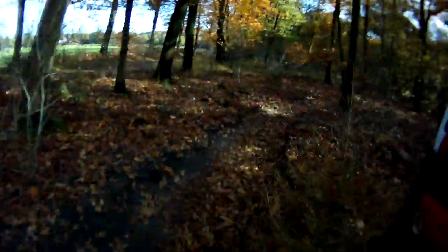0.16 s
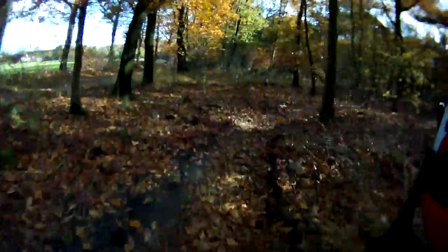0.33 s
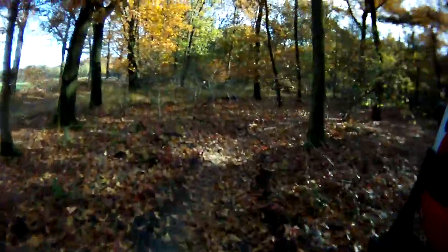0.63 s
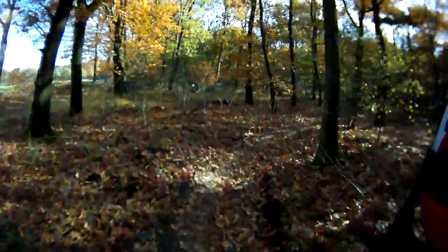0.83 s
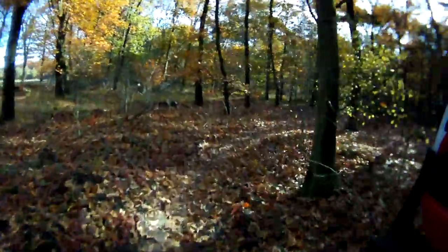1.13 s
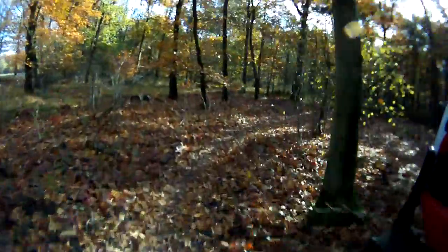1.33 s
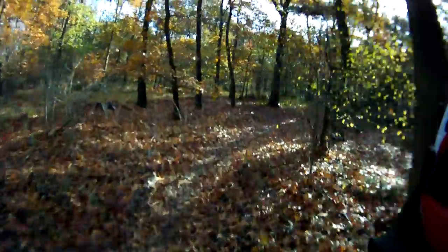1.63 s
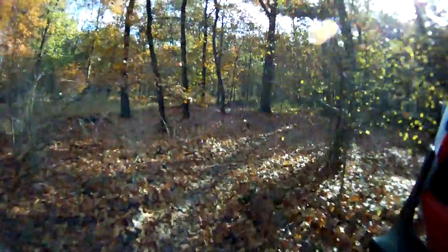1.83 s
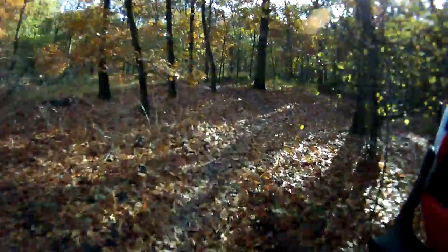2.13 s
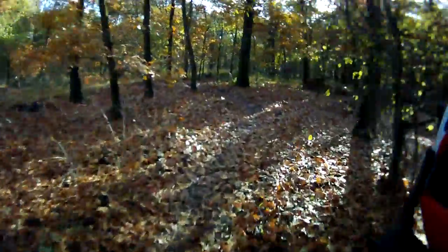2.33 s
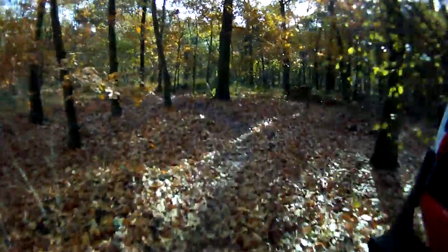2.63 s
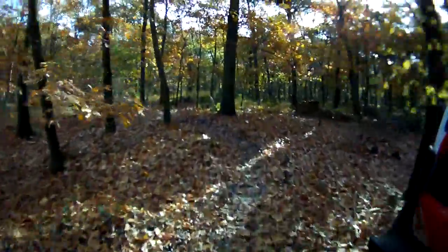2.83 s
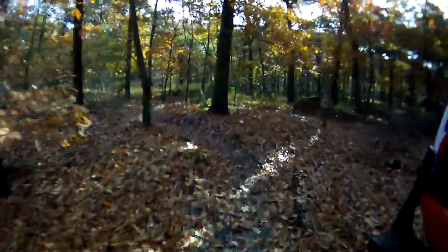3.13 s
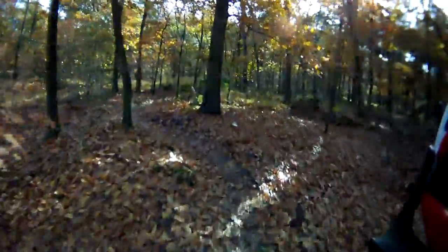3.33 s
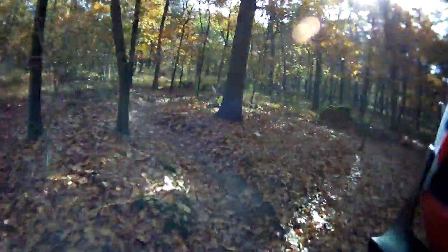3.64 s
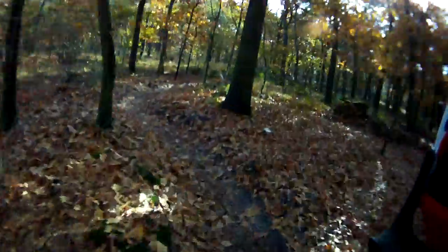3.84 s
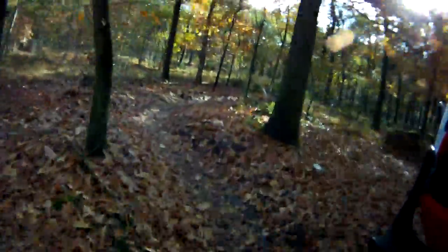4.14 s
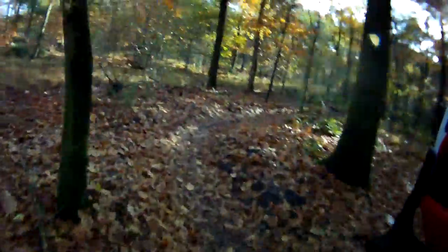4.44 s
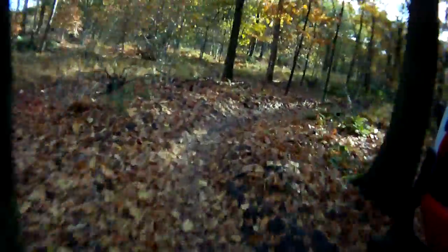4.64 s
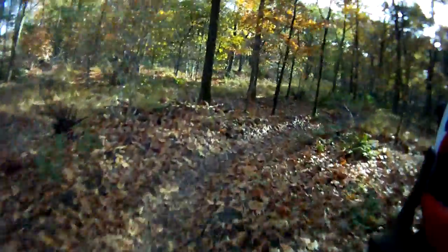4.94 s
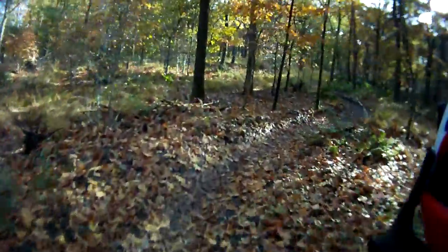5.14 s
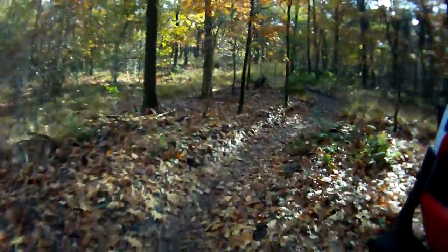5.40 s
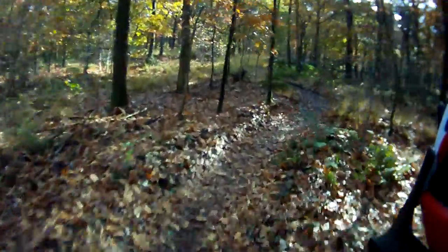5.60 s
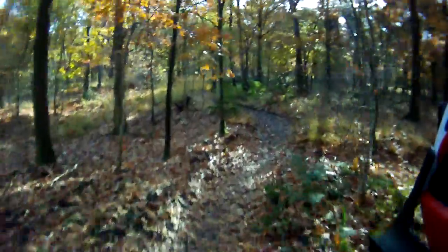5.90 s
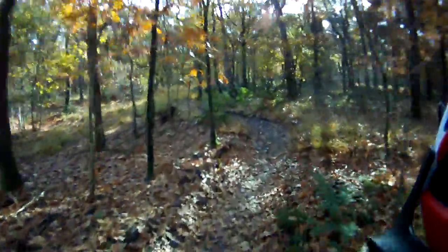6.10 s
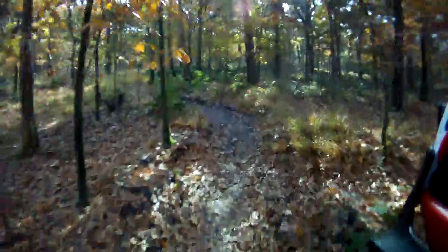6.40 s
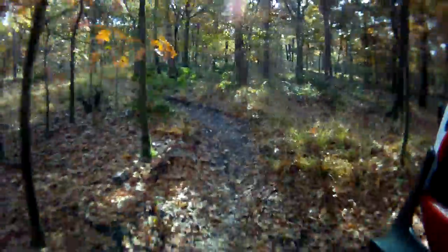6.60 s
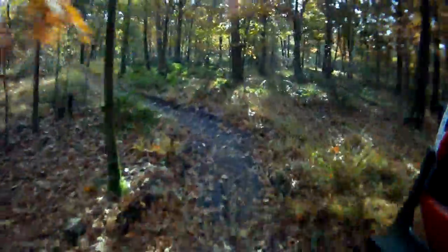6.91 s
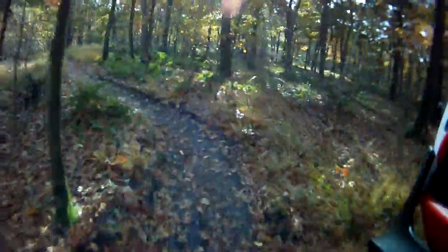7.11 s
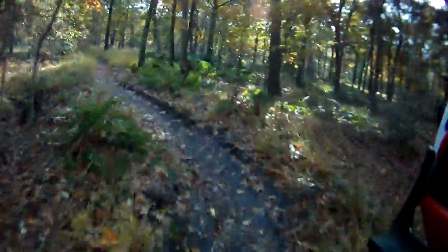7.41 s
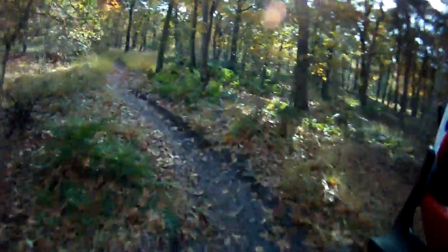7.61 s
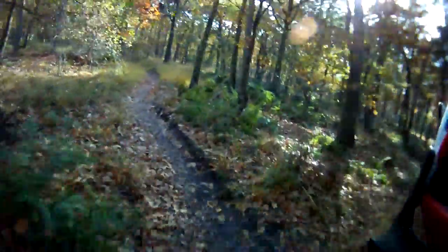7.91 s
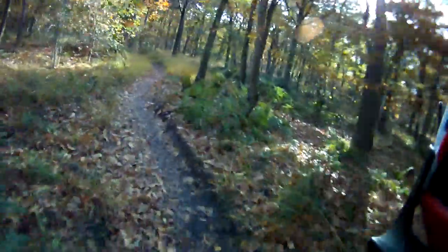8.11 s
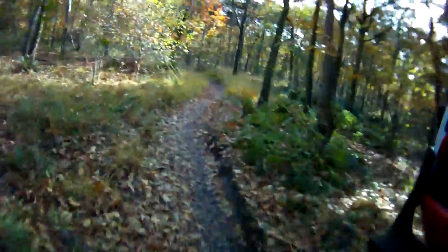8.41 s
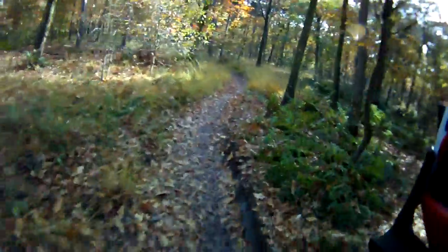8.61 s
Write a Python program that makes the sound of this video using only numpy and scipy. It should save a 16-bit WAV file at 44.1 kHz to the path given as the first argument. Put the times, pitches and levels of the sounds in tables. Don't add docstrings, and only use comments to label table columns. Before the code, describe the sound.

A boxed-in camera microphone rides with a bicycle over a leaf-covered trail. Wind and tyres make a constant, muffled, fluctuating rumble; leaves rustle and crackle with a hollow plastic colour. Small taps, pings and soft jolts come irregularly. The ride swells near three and again before seven seconds, with a hard crack just after four and another close to the end.

```python
import sys
import numpy as np
from scipy import signal
from scipy.fft import rfft, irfft, next_fast_len
from scipy.io import wavfile
from scipy.ndimage import uniform_filter1d, map_coordinates

SR = 44100
rng = np.random.default_rng(int(sys.argv[2]) if len(sys.argv) > 2 else 0)


def elevation(decibels):
    levels = np.asarray(decibels, float)
    return 10 ** (levels / 20)


def wav_out(sig):
    wavfile.write(sys.argv[1], SR, np.round(np.clip(np.atleast_2d(sig).T, -1, 1) * 32767).astype(np.int16))


N = 385875
TAIL = 1500


def unit(x):
    return x / np.sqrt(np.mean(x ** 2) + 1e-20)


def curves(rows):
    s, *cols = np.transpose(rows)
    return [np.interp(np.arange(N) / SR, s, c) for c in cols]


def swells(rows):
    t = np.arange(0, N / SR, .002)
    total_db = sum(db * np.exp(-((t - s) / half) ** 2) for s, db, half in rows)
    return np.interp(np.arange(N) / SR, t, total_db)


def wobble(rate):
    knots = rng.standard_normal(int(N * rate / SR) + 4)
    return map_coordinates(knots, [np.arange(N) * rate / SR])


def filtered(x, response):
    m = next_fast_len(len(x) + 8192)
    return irfft(rfft(x, m) * response(np.fft.rfftfreq(m, 1 / SR)), m)[:len(x)]


def resonance(mode):
    centre, width, db = mode
    return lambda f: elevation(db) * 1j * f * width / (centre * centre - f * f + 1j * f * width)


def ringing(modes, x):
    return sum((-1) ** k * filtered(x, resonance(mode)) for k, mode in enumerate(modes))


def rush(spectrum, patchy_db):
    z = signal.stft(rng.standard_normal(N), nperseg=512)[2]
    field = uniform_filter1d(rng.standard_normal(z.shape), size=4, axis=0)
    field = uniform_filter1d(field, size=8, axis=1)
    noise = signal.istft(z * elevation(patchy_db * unit(field)), nperseg=512)[1][:N]
    hz, db = np.transpose(spectrum)
    return unit(filtered(noise, lambda f: elevation(np.interp(np.log(f + 1), np.log(hz), db))))


def add(out, s, db, hz, t60, rise):
    t = np.arange(TAIL)[:, None] / SR
    ring = np.sin(2 * np.pi * (np.atleast_1d(hz) * t + .2 * rng.random(np.size(hz))))
    envelope = elevation(db - 60 * t / t60) * (1 - np.exp(-(t / rise) ** 2))
    out[round(s * SR):][:len(t)] += np.sum(envelope * ring, axis=1)


def single_tones(rows, louder_db, t60, rise):
    out = np.zeros(N + TAIL)
    for s, db, hz in rows:
        add(out, s, db + louder_db, hz, t60, rise)
    return out[:N]


# (f/Hz, level/dB per Hz)
BUFFET = [(10, -43), (25, -8.5), (60, -1.5), (100, 0.5), (160, 2), (250, -1), (400, -8), (800, -60),
          (1600, -100)]
# (t/s, level/dB)
WIND = [(0, -47.5), (.6, -47), (1.2, -45.5), (1.75, -46), (2.35, -44), (2.55, -43), (2.85, -41.5),
        (3.2, -44), (3.9, -45.5), (4.5, -49), (5.2, -46.5), (5.65, -47), (6.2, -44.5), (6.7, -43.5),
        (7.3, -43.5), (7.6, -47.5), (7.95, -46), (8.75, -46.5)]
# (t/s, level change/dB)
EDDIES = [(0, 0), (.9, -3), (1.5, -2.5), (2.1, 1), (2.6, -2), (3.1, 2), (3.7, -1), (4.9, 3), (5.9, -2),
          (6.9, 1), (7.5, 1), (8.75, 1.5)]
# (t/s, level change/dB, half length/s)
SHELTER = [(.12, -6, 0.032), (.69, 4.5, .03), (.96, 3.5, 0.027), (.61, -3, 0.028), (1.3, -4, .09),
           (2.44, -3, .03), (5.33, -4, .04), (6.24, -3, .03), (7.07, 3, 0.027), (7.41, -3, .02),
           (7.72, -3, .025), (7.92, 3.5, .03), (8.48, -3, .02), (1.8, 4, 0.035), (1.89, -7, 0.04),
           (4.68, 2.5, 0.036), (5.13, -5, 0.046), (5.88, 4.5, 0.034), (6.0, -3, 0.033), (6.94, -10, .02),
           (7.15, -3.5, 0.044), (8.02, -5, 0.017), (8.55, -5, 0.07)]


def wind():
    eddy_hz = 115
    shelter_db = swells(SHELTER)
    buffet = rush(BUFFET, patchy_db=-0.8)
    throb = filtered(buffet, lambda f: 1 / (1 + (f / eddy_hz) ** 6))
    buffet = buffet + (elevation(curves(EDDIES)[0] - .5 * shelter_db) - 1) * throb
    return elevation(curves(WIND)[0] + shelter_db) * buffet


def unloading():
    t = np.arange(N) / SR
    dip = np.zeros(N)
    for s, *_ in list(JOLTS) + list(STONES):
        near = slice(max(round((s - .04) * SR), 0), round(s * SR))
        dip[near] -= 8 * np.exp((t[near] - s) / 0.0062)
    return uniform_filter1d(dip, size=40)


# (f/Hz, level/dB per Hz)
RUMBLE = [(80, -56), (160, -26), (280, -3.5), (420, 0), (540, 0), (700, -6.5), (900, -15.5), (1200, -29),
          (2500, -71)]
# (f/Hz, level/dB per Hz)
SCRUB = [(500, -69), (900, 0.5), (1150, 1), (1550, 1), (2000, -4), (3000, -7), (6000, -31)]
# (t/s, level/dB)
LOAD = [(0, -48), (.4, -47.5), (1.2, -46.5), (1.7, -46.5), (2.4, -45), (2.75, -43.5), (3.1, -46),
        (3.8, -44.5), (4.1, -47.5), (5, -46.5), (5.15, -48.5), (5.6, -47), (5.9, -44.5), (6.6, -42),
        (7.1, -43.5), (7.6, -48.5), (8.1, -46.5), (8.75, -47)]
# (t/s, level change/dB, half length/s)
HUMPS = [(.12, -3, .02), (.9, -3, 0.06), (1.13, 3.5, .02), (1.17, -2, .015), (2.62, 2.5, .03),
         (3.27, -2, .05), (6.33, 2, 0.028), (6.49, -2, 0.023), (6.55, 3.5, 0.021), (6.61, -2.5, 0.018),
         (6.74, 2.5, .03), (6.83, -2, .04), (7.65, -1, .03), (7.8, 2, .04), (1.25, -2.5, 0.078),
         (1.83, 4.5, .02), (1.89, -2.5, 0.056), (2.04, 2, .02), (3.07, 3.5, .04), (3.42, 1.5, 0.04),
         (3.57, -3.5, 0.074), (4.1, -2.5, .04), (4.31, 4, 0.056), (4.52, 3, 0.048), (4.68, -2, 0.033),
         (4.75, 3, 0.038), (5.3, 2, 0.083), (5.63, -3.5, 0.091), (6.02, -3.5, 0.036), (6.21, -3, 0.047),
         (7.87, -2.5, 0.011), (7.92, 3.5, .03), (8.02, -2.5, .02), (8.1, 2.5, 0.026), (8.15, -3.5, 0.029),
         (8.26, 2, 0.039)]


def tyres():
    rumble_db = curves(LOAD)[0] + swells(HUMPS)
    usual_db = rumble_db.mean()
    scrub_db = usual_db - 18.5 + 0.92 * (rumble_db - usual_db)
    scrub_db = scrub_db + 0.1 * swells(HEAPS) + 0.52 * wobble(15)
    bumps = wobble(60)
    rumble = unit(elevation(1.0 * bumps) * rush(RUMBLE, patchy_db=0.5))
    scrub = unit(elevation(0.7 * bumps + 1.7 * wobble(150)) * rush(SCRUB, patchy_db=-0.8))
    return elevation(rumble_db + unloading()) * rumble + elevation(scrub_db) * scrub


def crackles(per_second, size_db, clump_db, count):
    density = per_second * elevation(clump_db * wobble(14))
    draw = rng.random((count, 3))
    arrival = np.cumsum(-np.log(1 - draw[:, 0]))
    at = np.searchsorted(np.cumsum(density) / SR, arrival)
    size = elevation(-size_db * np.log(1 - .998 * draw[:, 1])) * np.sign(draw[:, 2] - .5)
    return np.bincount(at[at < N], size[at < N], N)


def crush():
    snapping = unit(crackles(1500, size_db=3.5, clump_db=1.26, count=30000))
    return snapping + 0.5 * rng.standard_normal(N)


# (f/Hz, width/Hz, level/dB)
CASE = [(1550, 400, -2), (2450, 280, 3), (2980, 310, 4.5), (3904, 670, 6), (4880, 670, 2), (5760, 260, -8),
        (6700, 560, -7.5), (9000, 2200, -14), (12160, 430, -22)]
# (t/s, level/dB)
DEPTH = [(0.0, -65), (0.36, -64), (0.78, -68), (1.61, -64.5), (1.88, -62.5), (2.24, -64.5), (2.7, -59),
         (2.9, -67), (3.34, -61), (3.51, -65.5), (4.97, -62.5), (5.07, -63), (5.78, -67.5), (6.21, -62.5),
         (7.14, -65), (7.63, -69.5), (8.09, -68.5), (8.75, -70.5)]
# (t/s, level change/dB, half length/s)
HEAPS = [(.06, 8, 0.024), (.16, -4, .02), (.21, 2.5, .03), (.54, 3, .015), (.88, 2, .015), (3.95, 3, .06),
         (4.53, 2, .03), (5.3, 1, 0.073), (3.16, -3, .045), (3.29, 2, .05), (3.55, -4, .04),
         (.34, 5.5, .02), (.5, 2, 0.03), (.66, 8.5, 0.0093), (1.0, 3, .02), (1.1, 2, .03), (1.33, 2, .04),
         (1.62, 2, 0.025), (2.27, 4, .03), (2.5, 3.5, 0.04), (2.86, 5.5, 0.047), (3.7, 3, .03),
         (3.87, -7, 0.015), (4.12, -2, 0.013), (4.2, 4.5, 0.075), (4.41, 2.5, 0.017), (4.6, 5, 0.021),
         (5.04, 3.5, 0.072), (5.55, 3, 0.073), (4.28, 6, .008), (4.89, 3, .02), (6.14, 4.5, 0.036),
         (6.23, 4, .025), (6.5, 2.5, .03), (6.44, 4.5, 0.024), (6.96, 2.5, .03), (7.1, 8, .02),
         (8.125, 6, 0.018), (1.27, -2.5, .03), (8.71, 9, 0.033)]


def leaves():
    crunch_db = curves(DEPTH)[0] + swells(HEAPS)
    bright_db = -8.5 - 0.2 * (crunch_db - crunch_db.mean()) + 0.7 * wobble(12)
    flutter_db = 1.5 * wobble(50)
    shared = crush()
    body = np.zeros(N)
    for k, mode in enumerate(CASE[1:5]):
        body += (-1) ** k * filtered(shared + 1.17 * crush(), resonance(mode))
    body = filtered(unit(body), lambda f: 1 / np.sqrt(1 + (f / 5250) ** 16))
    edge = unit(ringing(CASE[5:], shared + 2.1 * crush()))
    return elevation(crunch_db + flutter_db - 1.15) * (body + elevation(bright_db - 0.5) * edge)


WRITES = [1, 3, 4, 6, 8, 9, 11, 14, 17, 18, 21, 24, 26, 28, 29, 32, 33, 34, 36, 39, 44, 45, 47, 49, 50, 51,
          53, 54, 56, 58, 62, 64, 66, 68, 70, 72, 74, 77, 78, 80, 82, 83, 85]


def writing():
    first_s, slot_s, half_s = .028, 1 / 9.99, .011
    return swells([(first_s + slot * slot_s, 1, half_s) for slot in WRITES])


# (f/Hz, level/dB per Hz)
HISS = [(1000, 3.5), (3000, -3.5), (6000, -0.5), (8000, -4.5), (10500, -3), (12000, -2.5), (12800, -3),
        (13400, 3), (14900, 0.5), (15400, -60)]
# (f/Hz, level/dB per Hz)
FIZZ = [(10000, -40), (10800, -6), (11500, 0), (12300, -1), (13000, -8), (14500, -8), (15400, -40)]
# (f/Hz, rms level/dB)
WHINE = [(5545, -90), (11090, -97)]


def electronics():
    t = np.arange(N) / SR
    whine = np.zeros(N)
    for hz, db in WHINE:
        whine += np.sqrt(2) * elevation(db) * np.sin(2 * np.pi * hz * t + 0.77 * wobble(30))
    hiss = elevation(-68.0) * rush(HISS, patchy_db=1.4)
    fizz = elevation(-74) * writing() * rush(FIZZ, patchy_db=1.5)
    return hiss + fizz + whine


# (t/s, peak level/dB, f/Hz)
PINGS = [(0.025, -49, 6450), (4.1704, -49, 6290), (4.2268, -46, 5900), (4.3021, -44, 6460),
         (4.6783, -55, 6780), (4.7435, -44, 5750), (4.988, -40, 6490), (6.0636, -47, 5740),
         (6.3465, -52, 6340), (6.733, -41.5, 5950), (7.414, -50, 6450), (7.7248, -44, 6300),
         (8.0222, -48, 6430), (8.3175, -48, 6380), (8.7225, -30.5, 6500)]


def pings():
    return single_tones(PINGS, louder_db=1.5, t60=0.0065, rise=0.00051)


# (f/Hz, level/dB, t60/s)
STRUCK = [(1590, -3, 0.016), (2780, 5.5, 0.016), (3100, 7, 0.013), (3700, 1.5, 0.01), (4100, 1.5, 0.013),
          (5030, 2, 0.023), (5950, -7, 0.0075), (6370, 3, 0.0092)]
# (t/s, peak level/dB, centre f/Hz)
TWIGS = [(0.0253, -52, 2780), (0.0648, -52, 3030), (0.9827, -49, 2980), (1.1263, -54, 2790),
         (1.1817, -55, 2710), (1.7325, -49, 3240), (2.2323, -48, 3280), (2.2583, -49, 3040),
         (2.4613, -55, 3000), (2.6125, -48, 3090), (2.8345, -50, 3230), (3.1622, -54, 3000),
         (3.2799, -44, 3200), (3.7389, -49, 2840), (3.8167, -54, 3080), (4.144, -49, 2800),
         (4.2192, -43, 2850), (5.3887, -51, 3010), (5.872, -52, 2900), (6.0711, -51, 3120),
         (6.8932, -49, 2970), (6.9531, -51, 3010), (7.2878, -53, 3170), (7.2993, -53, 3110),
         (7.309, -50, 2950)]
# (t/s, peak level/dB, centre f/Hz)
GRIT = [(0.3394, -51, 4050), (0.6614, -46, 3830), (0.9832, -44, 3980), (1.1812, -47, 3700),
        (2.638, -45, 4650), (2.6928, -45, 4040), (2.7242, -46, 4030), (2.7506, -45, 4300),
        (2.8574, -43, 3950), (4.1285, -51, 3850), (4.5406, -53, 4060), (4.6783, -55, 3700),
        (4.9357, -44, 3870), (4.9801, -47, 3880), (5.03, -44.5, 4180), (5.461, -49, 3910),
        (6.0636, -51, 3950), (7.0609, -48, 3850), (7.0913, -50, 3840), (7.423, -49, 3700),
        (7.4839, -50, 3800), (7.9458, -49, 4000), (8.4103, -46, 3980)]
# (t/s, peak level/dB, centre f/Hz)
MORE_TICKS = [(0.1795, -52, 3750), (2.1051, -51, 3570), (2.2827, -49, 5030), (2.5494, -49, 3940),
              (4.038, -46, 3910), (4.3056, -49, 4690), (4.3994, -49, 4510), (7.2394, -54, 3820),
              (7.2594, -51, 4120), (7.3876, -53, 3950), (7.5094, -54, 4920), (7.87, -49, 3670),
              (7.8844, -48, 3920), (7.9244, -54, 4080), (7.9678, -52, 5180)]


def ticks():
    out = np.zeros(N + TAIL)
    tick_db, own_db, fall_db_per_octave = -7.5, 3, 14
    hz, mode_db, t60 = np.transpose(STRUCK)
    for s, db, centre_hz in list(TWIGS) + list(GRIT) + list(MORE_TICKS):
        own_t60 = 0.013 * np.exp(-0.02 * (db + 47))
        add(out, s, db + tick_db + own_db, centre_hz, own_t60, rise=0.00073)
        detune = 1 + 0.02 * rng.standard_normal(len(hz))
        octaves_away = np.abs(np.log2(np.maximum(hz, 2600) / centre_hz))
        share_db = mode_db - fall_db_per_octave * octaves_away
        add(out, s, db + share_db + tick_db, hz * detune, t60, rise=0.00036)
    return out[:N]


# (t/s, peak level/dB, f/Hz)
STEMS = [(0.3332, -53, 2570), (0.3432, -51, 4080), (0.4786, -53, 2900), (0.6553, -55, 2660),
         (0.8286, -57, 2650), (0.8715, -57, 2870), (0.8766, -52, 4170), (1.0797, -53, 2820),
         (1.0919, -56, 4210), (1.2963, -56, 4050), (1.3985, -51, 3870), (1.4046, -55, 2530),
         (1.9885, -52, 2980), (2.048, -53, 2520), (2.1061, -54, 2760), (2.1096, -56, 3860),
         (2.4842, -50, 3850), (2.8407, -51, 3040), (3.0752, -53, 2810), (3.1627, -58, 3700),
         (3.2802, -52, 3500), (3.3626, -52, 2680), (3.6849, -54, 3920), (3.6924, -54, 2670),
         (3.7388, -51, 3940), (3.8263, -48, 2530), (3.8332, -53, 2950), (3.9058, -56, 2670),
         (3.9156, -54, 2710), (3.9965, -55, 4010), (4.4042, -54, 4100), (4.5417, -53, 2420),
         (4.5931, -51, 2580), (5.247, -55, 2780), (5.5415, -56, 2650), (5.5505, -52, 3700),
         (5.5514, -55, 2980), (5.7068, -55, 3950), (5.8723, -53, 3730), (5.8797, -54, 2810),
         (5.9458, -53, 2910), (5.9763, -51, 3950), (6.1494, -53, 4040), (6.6679, -55, 3980),
         (6.8938, -54, 3980), (7.2598, -55, 2920), (7.2887, -55, 3760), (7.3083, -56, 3600),
         (7.5923, -57, 2640), (7.9249, -56, 2790), (7.947, -55, 2930), (8.1312, -54, 2830)]
# (t/s, peak level/dB, f/Hz)
FLAKES = [(0.0258, -52, 4900), (0.0655, -60, 6620), (0.0656, -51, 4780), (0.2181, -60, 6640),
          (0.5293, -63, 5010), (0.8764, -58, 4690), (1.093, -57, 4720), (1.1264, -60, 5980),
          (1.6035, -61, 4900), (1.9885, -55, 4790), (2.3694, -57, 4880), (2.6387, -48, 4660),
          (2.8699, -57, 4920), (2.9004, -54, 5020), (3.0525, -56, 4810), (3.218, -54, 4900),
          (3.4812, -53, 4760), (3.6934, -57, 4990), (3.7394, -59, 4820), (3.9035, -51, 4950),
          (3.9136, -59, 6090), (3.9159, -58, 4940), (4.148, -53, 4910), (4.2861, -59, 5020),
          (4.3841, -59, 5830), (4.404, -57, 4710), (4.5742, -55, 4750), (4.5906, -53, 4830),
          (4.6001, -54, 4720), (4.6788, -50, 4770), (6.026, -56, 4720), (6.0643, -54, 5080),
          (6.1398, -57, 4750), (6.1594, -54, 4720), (6.431, -57, 5880), (6.5148, -55, 4930),
          (6.9529, -56, 4800), (7.0616, -57, 4920), (7.2626, -59, 4780), (7.4227, -56, 4890),
          (7.4851, -60, 5930), (7.4854, -59, 5050), (7.8834, -59, 6000), (8.1311, -59, 6080),
          (8.7168, -59, 5060)]


def stems_and_flakes():
    return single_tones(list(STEMS) + list(FLAKES), louder_db=5.0, t60=0.0095, rise=0.00054)


# (t/s, peak level/dB, f/Hz)
STONES = [(.393, -34, 517), (.714, -46, 520), (1.132, -41, 500), (1.772, -31.5, 480), (2.276, -40, 520),
          (2.441, -43, 520), (3.003, -40, 386), (3.082, -39, 363), (3.809, -37, 409), (3.883, -42, 490),
          (4.253, -38, 490), (4.43, -43, 420), (5.719, -37, 425), (5.775, -46, 520), (6.32, -35, 480),
          (6.54, -39, 468), (6.73, -43, 500), (7.065, -37, 463), (7.898, -38, 519), (8.23, -40, 423),
          (8.631, -44, 560)]
# (t/s, peak level/dB, f/Hz)
JOLTS = [(1.06, -34, 530), (1.817, -45, 580), (2.371, -31.5, 477), (2.623, -34, 546), (2.74, -33, 535),
         (2.912, -49, 550), (4.154, -32.5, 544), (4.822, -34.5, 508), (4.974, -29, 440), (6.425, -55, 520),
         (6.625, -35, 547), (7.102, -40, 427), (7.194, -39, 524), (7.286, -37, 580), (7.428, -39, 570),
         (7.701, -34.5, 557), (8.076, -45, 557), (8.316, -35, 500)]


def jolts():
    out = np.zeros(N + TAIL)
    for s, db, pitch_hz in list(STONES) + list(JOLTS):
        add(out, s, db - np.array([3, 8]), pitch_hz * np.array([1, 1.45]), t60=0.05, rise=0.0012)
    return out[:N]


# (t/s, peak level/dB, body f/Hz, splinter
# f/Hz)
BRANCHES = [
    (1.0605, -55, 1600, 2200),
    (4.306, -50, 1600, 2450),
]


def branches():
    out = np.zeros(N + TAIL)
    for s, db, body_hz, splinter_hz in BRANCHES:
        pitches = [body_hz, body_hz, splinter_hz]
        add(out, s, db + np.array([-2, -6, 3]), pitches, t60=0.018, rise=0.0007)
    return out[:N]


# (t/s, peak level/dB, f/Hz)
CRACKS = [(3.0624, -40, 3230), (3.062, -42, 3750), (4.2272, -34, 3060), (4.2266, -36, 4130),
          (4.2264, -36, 5010), (4.226, -38, 1550), (4.2272, -45, 2400), (4.2305, -44, 5100),
          (4.2275, -50, 6800), (7.039, -36.5, 4160), (7.0394, -45, 4750), (7.0394, -46, 3600),
          (7.0392, -50, 5400), (7.0405, -45, 2900), (7.7248, -34, 2900), (7.7248, -40, 3260),
          (7.7243, -40, 5110), (6.5, -43, 1550), (7.7246, -40, 5900), (7.7245, -47, 4200),
          (7.7245, -46, 2100)]


def cracks():
    return single_tones(CRACKS, louder_db=5, t60=0.0102, rise=0.0013)


# (t/s, peak level/dB)
SNAPS = [
    (4.2243, -44),
    (4.2268, -42),
    (4.2303, -46),
    (4.3051, -49),
    (7.7238, -46),
    (8.3175, -54),
    (8.531, -58),
]


def snaps():
    out = np.zeros(N + TAIL)
    for s, db in SNAPS:
        hz = np.linspace(7000, 15600, 24) + rng.normal(0, 300, 24)
        add(out, s, db - 13, hz, t60=0.007, rise=0.0006)
    return out[:N]


def scene():
    rolling = wind() + tyres() + leaves() + jolts()
    small_hits = pings() + ticks() + stems_and_flakes() + branches() + cracks() + snaps()
    return (rolling + small_hits + electronics())[None]


# (f/Hz, share 0-1)
CELLS = [(9000, 1), (10500, .82), (12300, .78), (12700, .4), (13450, .4), (13550, .4), (15000, .45)]
# (f/Hz, share 0-1)
REACH = [(12700, 1), (12800, .85), (13480, .75), (13520, .24), (14200, .2), (14300, .04), (15030, .02),
         (15070, .004)]


def thinned(x):
    lead = 1024 - 169
    hz, _, z = signal.stft(np.pad(x, ((0, 0), (lead, 0))), SR, window="cosine", nperseg=2048)
    power = np.abs(z[0]) ** 2
    top = np.sum(power[hz > 9000], axis=0)
    favour = np.maximum(top / np.median(top) / 1.3, 1) ** 1.5
    load = np.log(np.sum(power[hz > 2000], axis=0) + 1e-20)
    load = np.exp(uniform_filter1d(load, size=25))
    ease = np.interp(hz, [12700, 13600, 14200, 14400], [0, 2.2, 2.4, 1])[:, None]
    spare = (np.median(load) / load) ** ease
    chance = rng.random(z.shape[1:])
    row = np.arange(len(hz))
    cell = np.where(hz < 13500, row // 4, row // 8 + 300)
    keep = chance[cell] < np.interp(hz, *np.transpose(CELLS))[:, None] * favour
    busy = writing()[np.clip(np.arange(len(top)) * 1024 - lead, 0, N - 1)] > .3
    reach = np.interp(hz, *np.transpose(REACH))[:, None] * favour * spare
    extra = np.interp(hz, [13500, 14200, 14300, 15030, 15070], [.1, .15, .9, .75, 0])
    reach += busy * extra[:, None]
    very_high = (hz > 14250)[:, None]
    keep &= np.where(very_high, rng.random(len(top)), rng.random(len(top))) < reach
    keep |= (hz < CELLS[0][0])[:, None]
    return signal.istft(z * keep, SR, window="cosine", nperseg=2048)[1][:, lead:lead + N]


def band_limit(x):
    return signal.sosfilt(signal.butter(12, 15470, fs=SR, output="sos"), x)


def record(dry):
    mix = thinned(dry)
    return band_limit(mix)


dry = scene()
out = record(dry)
wav_out(out)
```